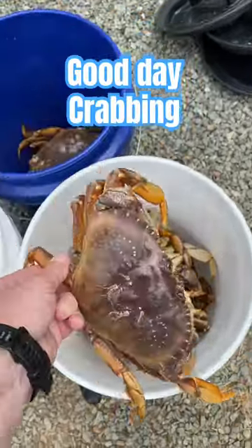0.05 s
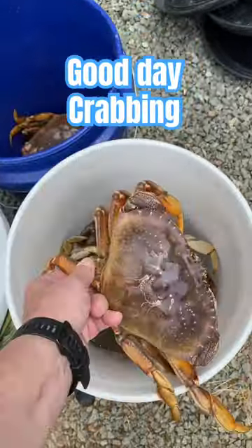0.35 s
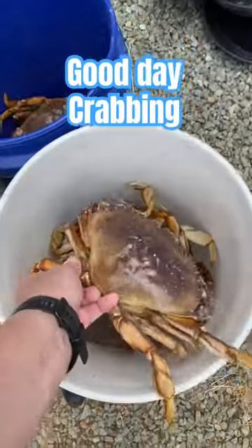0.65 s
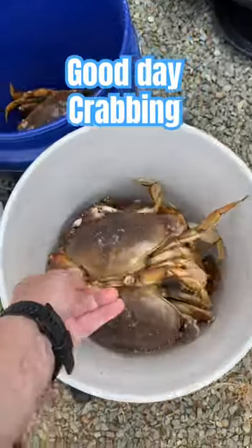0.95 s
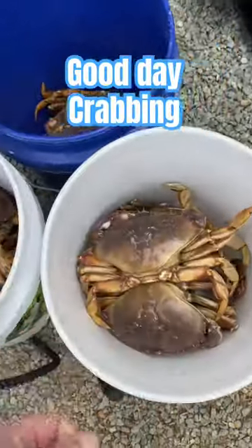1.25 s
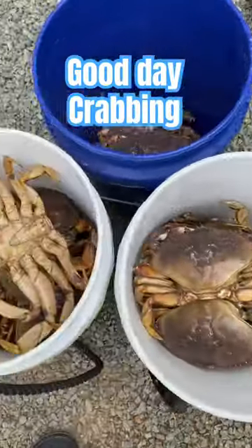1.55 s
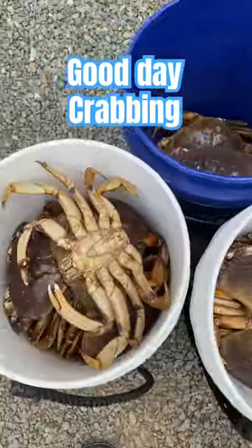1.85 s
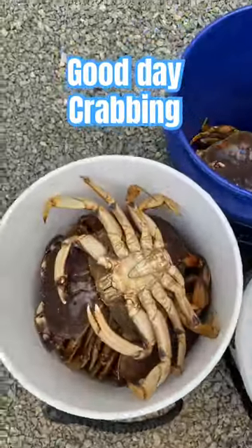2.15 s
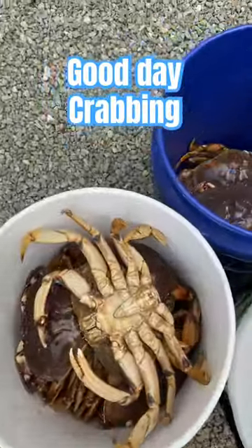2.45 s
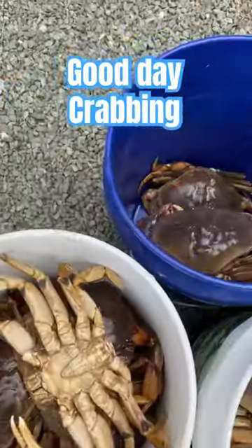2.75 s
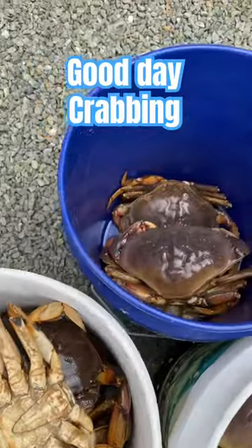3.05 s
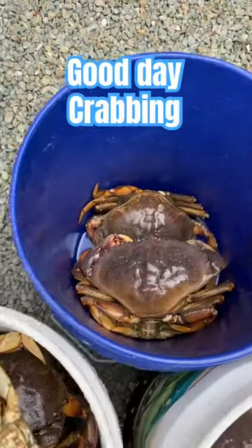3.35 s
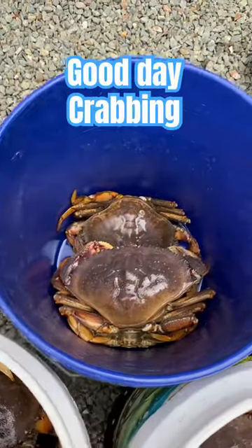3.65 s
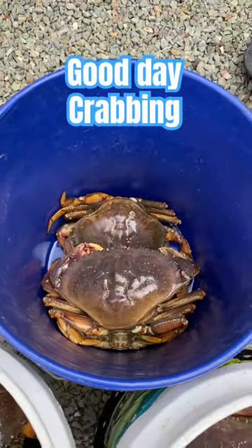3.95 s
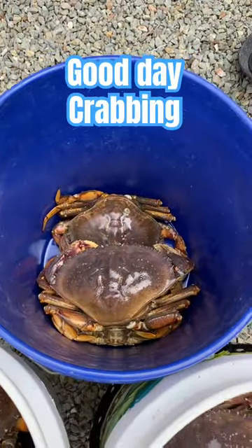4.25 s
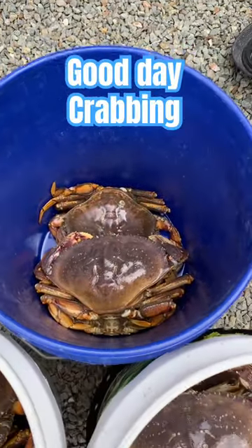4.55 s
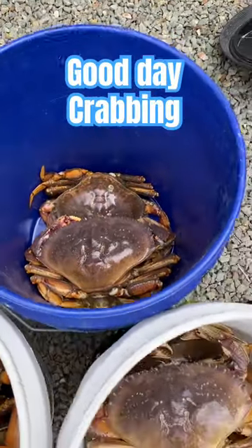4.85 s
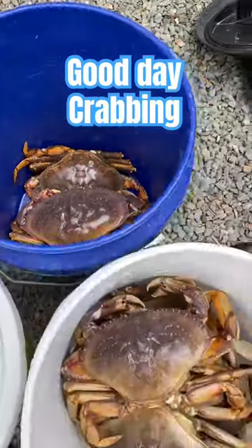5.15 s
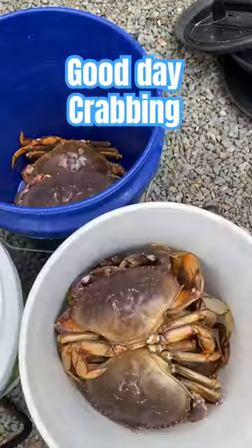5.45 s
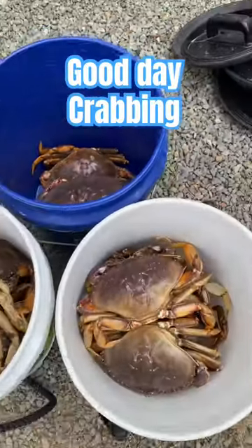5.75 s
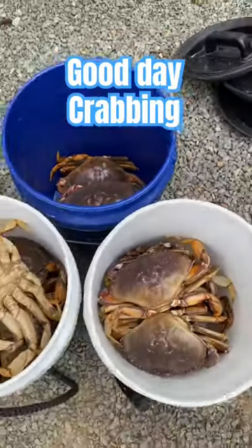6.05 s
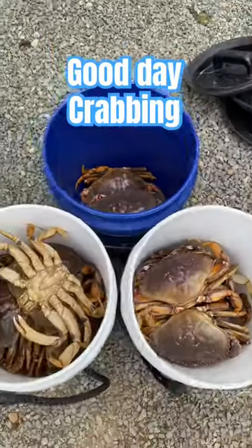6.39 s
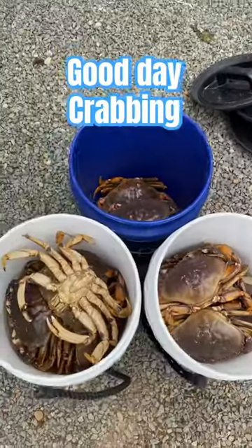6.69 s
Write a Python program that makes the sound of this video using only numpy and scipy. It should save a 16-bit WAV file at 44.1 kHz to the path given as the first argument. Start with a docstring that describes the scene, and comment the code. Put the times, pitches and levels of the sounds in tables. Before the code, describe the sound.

A hand-held microphone moves above buckets of live crabs outdoors. After a few light taps, spiny legs rasp on plastic and one crab drops onto the pile, its shells clattering and the bucket floor booming briefly. The crabs then stir quietly, with sparse clicks, small scrapes and faint wet crackles. A low rumble and hissing drone of far-off machinery continues underneath.

```python
"""Distant machinery rumbles, drones and hisses throughout, heard through the two ports of a hand-held
microphone moving above the buckets. Crabs stir and tap in a plastic bucket on gravel. At 0.6 s a live
crab is lowered in: its spiny legs catch and slip on the wall. From 0.8 s it drops on the others with a
clatter of hollow shells and dull bumps, and its weight booms the bucket floor. Afterwards shells and
claws tap now and then, with brief scrapes and thin ticks of wet leg tips; the drone has short pulses."""
import sys
import numpy as np
from scipy import signal
from scipy.fft import rfft, irfft, next_fast_len
from scipy.io import wavfile
from scipy.ndimage import map_coordinates

SR = 44100
rng = np.random.default_rng(int(sys.argv[2]) if len(sys.argv) > 2 else 0)


def bounce(signal):
    """Save signal as a 16-bit WAV file at the path given by the first command-line argument."""
    frames = np.transpose(np.atleast_2d(signal))
    limited = np.clip(frames, -1, 1)
    pcm = np.round(limited * 32767).astype(np.int16)
    wavfile.write(sys.argv[1], SR, pcm)


N = 300762
TIME = np.arange(N) / SR

# how alike the background is at the two ports: freq_hz, coherence
PORT_COHERENCE = [(130, 0.997), (200, 0.99), (260, 0.45), (370, 0.6), (430, 0.9), (700, 0.88), (850, 0.65),
                  (1150, 0.3), (1650, 0.25), (1950, 0.5), (3000, 0.9), (3800, 0.2), (4600, 0.78),
                  (6200, 0.1), (8500, 0.95)]
# where the background sits in the stereo image: freq_hz, left_right_db
BACKGROUND_PAN = [(100, 0), (200, -0.5), (262, -10.5), (320, -8), (380, -1), (480, 5.5), (620, 6.5),
                  (730, 1.5), (1000, 5.5), (1400, -1), (2100, -5.5), (3000, -0.5), (4000, 1), (5200, 0),
                  (7000, -2.5)]
# left-right phase offset by frequency, nearly opposite around 8.5 and 13.4 kHz: freq_hz, left_lead_rad
STEREO_PHASE = [(0, 0), (210, 0.05), (310, 2.1), (400, 1.3), (500, .6), (620, -.1), (900, .8), (1350, .6),
                (1950, .4), (2400, 1.9), (3000, 2.2), (3600, 1.9), (4400, 0), (7300, .6), (8500, 2.7),
                (10300, .1), (11700, -.2), (13400, -2.8), (15200, -.3)]
# delay of the gravel's reflection at the moving microphone: time_s, lag_ms
GRAVEL_LAG = [(0, 3.8), (0.8, 3), (2.1, 4.22), (3.0, 3.23), (4.2, 3.34), (5.2, 3.46), (5.8, 3.53),
              (6.82, 6.35)]
# tone curves of the machinery's layers: freq_hz, gain_db
RUMBLE_EQ = [(20, -36), (31, -39), (42, -11), (52, -12.5), (68, -3), (88, -4), (98, -4), (128, 2), (182, 1),
             (205, -6), (235, -21), (330, -53), (600, -59)]
LOWER_DRONE_EQ = [(170, -22.5), (255, -2.5), (320, -9), (400, -1.5), (490, 0.5), (640, 0.5), (700, -3),
                  (780, -43), (1000, -46.5)]
UPPER_DRONE_EQ = [(500, -12), (620, -10), (700, 0.5), (745, 1), (810, 3), (848, -53), (1000, -48.5)]
WHIRR_EQ = [(700, -14), (860, 6), (925, 9), (990, 3.5), (1110, 6), (1200, 2), (1450, 7), (1750, -0.5),
            (2000, -2), (2250, -5), (2700, -7), (4000, -33)]
HISS_EQ = [(1200, -42), (2200, -14), (2900, 2.5), (3300, -3), (3800, -4.5), (4600, -3), (6300, -8.5),
           (8300, -15.5), (10300, -8), (13300, -15), (15000, -19), (16000, -33)]
# slow fader rides on the machinery's layers: time_s, level_db
RUMBLE_FADER = [(0, -36), (2, -35), (3.4, -34.5), (4.2, -32.5), (5.2, -34), (5.7, -35.5), (6.82, -37)]
LOWER_DRONE_FADER = [(0, -41), (1.2, -41), (1.6, -37), (2.5, -36), (3.3, -40), (5.3, -42), (5.8, -39),
                     (6.82, -37.5)]
TREBLE_FADER = [(0, -46), (0.5, -48.5), (1.6, -47), (2.7, -45.5), (4, -47), (5.2, -45.5), (5.7, -47),
                (6.82, -46.5)]
# the deepest rumble against the rest of it: time_s, gain_db
SUB_FADER = [(0, -1.5), (0.8, -2), (1.5, 0.5), (3.2, 2), (4.7, -3.5), (6.82, 1.5)]
# narrow bands in the machinery noise: pitch_hz, half_width_hz, level_db
MACHINE_BANDS = [(129.8, 3.1, -53), (655, 25, -49.5), (1404, 17, -56), (1710, 19, -60.5)]
# the drone's lean: time_s, lower_left_right_db, upper_left_right_db
DRONE_PAN = [(0, 0, -0.5), (0.8, 3, -3), (2.1, 2.5, 0), (3.0, -0.5, -4), (4.3, 0, -5.5), (5.3, 1.5, -11),
             (6.3, 0.5, 1), (6.82, -5.5, 33)]
# resonances near the buckets: nearest_s, half_duration_s, pitch_hz, half_width_hz, level_db
PASSING_HOLLOWS = [(0.1, 2.3, 2470, 39, -60), (3.93, 1.03, 2457, 61, -54), (2.6, 1.4, 3100, 300, -66),
                   (4.87, 0.7, 2800, 74, -57.5), (1.7, 0.96, 4500, 380, -63), (6, 0.23, 4650, 320, -60.5),
                   (6.63, 0.21, 4560, 220, -63), (6.5, 0.55, 2330, 280, -55.5)]
# shell taps, with snap, tick and ring relative to the knock: start_s, level_db, knock_hz, snap_hz,
# snap_db, tick_db, contact_ms, left_right_db, echo_send_db, ring_db
SHELL_TAPS = [(0.0309, -18.5, 1350, 2270, 5, -18, 2.9, 2, 2, -20),
              (0.1412, -19, 1924, 2960, -8, -14.5, 1.3, 2, -0.5, -7),
              (0.271, -23, 1500, 2970, -6, -24, 4, 3, 2, -20),
              (0.666, -20, 1550, 4160, -5.5, -17, 2.7, 2, 3, -15),
              (0.7356, -22.5, 1390, 3000, -17, -30, 3.1, 3, 0, -10),
              (0.766, -22, 1510, 4430, -5, -7.5, 2.1, 1, 1, -20),
              (0.785, -19, 1200, 2100, -4, -30, 3, 3, 0, -8),
              (0.7922, -22, 1400, 2100, -12, -30, 3.7, 1, -4, -8),
              (0.8089, -16, 1400, 2800, -12, -18, 1.6, 7, -6, -14),
              (0.812, -9, 1540, 3000, -7, -9.5, 1.5, -1, 0, -12),
              (0.8252, -10, 1400, 4500, -13, -16, 0.72, 2, -3, -16),
              (0.8316, -15, 1380, 3480, -21, -22, 0.97, -3, 3, -14),
              (0.8345, -9.5, 1530, 7150, 4.5, 11.5, 0.89, 4, -2, -20),
              (0.8778, -10, 1540, 4200, -15, -22, 2, -2, -6, -14),
              (0.8827, -10.5, 1770, 4870, -9.5, -5, 1.7, 5, 3.5, -3),
              (0.8882, -14, 1700, 3500, -16, -18, 1.5, 0, -13, -3),
              (0.894, -17, 1640, 3500, -22, -20, 1.1, 2, -5, -8),
              (0.9425, -23, 1500, 3800, -10, -7, 1.1, 2, -8, -14),
              (1.2582, -18.5, 1380, 3540, -2.5, -11.5, 1.8, 0, 2, -20),
              (2.655, -31, 1810, 4200, -13, -18, 2.5, -2, 0, -11),
              (2.672, -32, 1750, 2800, -4, -18, 2, -2, 0, -12),
              (2.735, -24.5, 1910, 2800, 3, -4, 1.9, 2, 2, -14),
              (2.7526, -20.5, 1480, 4200, -6, -7, 2.1, -4, 4, -18),
              (2.883, -28, 1500, 2560, -16, -32, 1.5, -5, 2, -10),
              (3.0379, -19, 1790, 6300, -6, -12, 2, 6, -3, -11),
              (3.04, -17, 1730, 2770, 2, -14, 1.5, -6, -3, -9),
              (3.0448, -16, 1780, 4300, -9, -24, 1.5, -5, -6, -8),
              (3.067, -23, 1800, 3300, -10, -29, 2.4, -6, 1, -5),
              (3.652, -32.5, 1900, 2700, -14, -22, 2, 0, 1, 0),
              (3.67, -32, 1540, 2300, -8, -27, 2.6, -2, 3, -4),
              (4.741, -34, 1930, 2900, -13, -22, 2, -1, -3, -2),
              (4.7738, -23.5, 1830, 4600, -10, -10.5, 3.4, -1, -2, -6),
              (5.414, -33, 1750, 4200, -12, -18, 1.6, 0, -3, 3),
              (5.42, -25, 1640, 4230, -17, -12, 1.4, 3, 1, -1),
              (5.4238, -23, 1410, 3500, -9, -9, 0.98, 0, -10, -13),
              (5.439, -29, 1720, 4120, -10, -17, 1.7, 4, -3, -1),
              (5.45, -25, 1730, 4200, -12, -22, 1.2, 0, -5, 1),
              (5.455, -28, 1750, 4200, -4, -9, 1.2, 1, -6, -1),
              (5.473, -31, 1690, 4100, -5, -16, 1.4, 0, 5, -7),
              (5.68, -35, 1500, 2300, -9, -24, 2, 2, 0, -10),
              (6.131, -31.5, 1490, 2500, -2, -17, 1.5, -5, -3, -12)]
# air and wall modes of the bucket: pitch_hz, level_db, t60_s
BUCKET_MODES = [(565, -8, .16), (900, -3, .16), (1112, -1, .16), (1180, -2, .16), (1374, -2, .14),
                (1470, 1, .16), (1540, 0, .15), (1635, 0, .14), (1776, -3, .12), (1840, -2, .12),
                (1935, -4, .12), (2110, -5, .11), (3325, -3, .11), (4210, -3, .13)]
# shell sliding on plastic and shell: start_s, length_s, level_db, brightness_db, ring_db
SCRAPE_STROKES = [(0.609, 0.05, -40, -18, -9), (0.654, 0.084, -33, -21, -21),
                  (0.776, 0.03, -33.5, -11, -15), (0.805, 0.03, -33.5, 4, -21),
                  (0.849, 0.058, -30, 2.5, -10), (0.905, 0.067, -37.5, 3, -24),
                  (1.34, 0.089, -47.5, -3, -9), (2.641, 0.03, -43, -5, -14), (2.748, 0.008, -40, -1, -21),
                  (2.864, 0.014, -52, -22, -10), (3.034, 0.022, -34, -4.5, -5.5),
                  (3.3, 0.042, -61, 11, -17), (4.764, 0.029, -47, -11, -1), (5.409, 0.014, -45, 5, 5),
                  (5.437, 0.026, -44, 1, 1), (6.28, 0.019, -52, -19, -7)]
# tone curve of the rasp: freq_hz, gain_db
SCRAPE_EQ = [(150, -6), (260, 7.5), (500, -6), (900, 3.5), (1100, -1), (1260, -3.5), (1480, 4), (1780, 5),
             (2100, -3), (2500, -0.5), (3200, -4), (4300, -7), (7000, -20), (11000, -20), (16000, -18)]
# resonances of a rubbed shell: pitch_hz, half_width_hz, level_db
SHELL_RESONANCES = [(1390, 80, 3), (1720, 99, 2.5), (4170, 120, -19), (6860, 170, -12), (10100, 120, -17)]
# the crab's weight settling on the pile: start_s, level_db
LANDING_THUDS = [(0.812, -45), (0.884, -33), (0.901, -26), (0.911, -30.5)]
# modes of the loaded bucket floor: pitch_hz, level_db, t60_s
FLOOR_MODES = [(174, -1, 0.14), (221, 10, 0.18), (258, 2, 0.12), (340, -7, 0.08), (420, -11, 0.084),
               (500, 0, 0.076), (670, -15, 0.08), (896, 8.5, 0.057)]
# thin ticks of wet leg tips: start_s, peak_db, pitch_hz, contact_ms
LEG_TICKS = [(0.8395, -25, 10500, 0.97), (1.41, -30.5, 5840, 2.1), (1.4105, -33, 12000, 1.2),
             (2.71, -42, 7000, 1.5), (2.735, -35, 9900, 1.6), (2.933, -40, 12000, 1.3),
             (3.1445, -42, 9900, 1.2), (3.2093, -39, 11500, 1), (3.35, -42, 12000, 2),
             (3.657, -43, 12000, 1.5), (4.698, -40.5, 9900, 2.2), (5.1165, -41, 9800, 1),
             (5.397, -33, 9500, 1.4), (5.401, -37, 5500, 2.9), (5.485, -42, 6400, 2.8),
             (5.7416, -42, 12200, 1.5), (5.835, -38, 6040, 1.4)]
# dull bumps in the landing, later short pulses in the drone: start_s, peak_db, pitch_hz
LOW_MID_SWELLS = [(0.857, -27, 547), (0.884, -23, 484), (0.918, -32, 680), (2.768, -28, 684),
                  (3.140, -27, 655), (3.727, -29.5, 674), (6.001, -25, 604)]


def gain_of(db):
    """Decibels to amplitude."""
    return 10 ** (np.asarray(db) / 20)


def unit_rms(x):
    """Scales to rms 1."""
    return x / np.sqrt(np.mean(x ** 2) + 1e-20)


def unit_energy(x):
    """Scales each channel to energy 1."""
    return x / np.sqrt(np.sum(x ** 2, -1, keepdims=True) + 1e-20)


def curve_at(points, hz):
    """Reads a table on a log-frequency axis."""
    freq_hz, value = np.transpose(points)
    return np.interp(np.log(hz + 1), np.log(freq_hz + 1), value)


def automation(rows):
    """The columns of a time curve at every sample."""
    time_s, *columns = np.transpose(rows)
    return [np.interp(TIME, time_s, column) for column in columns]


def panned(db):
    """Left and right gains for a left-right difference in dB."""
    return gain_of(np.array([[.5], [-.5]]) * db)


def add(mix, start_s, sound):
    """Mixes a sound in at start_s."""
    part = mix[..., max(round(start_s * SR), 0):][..., :sound.shape[-1]]
    part += sound[..., :part.shape[-1]]


def band(x, lo_hz, hi_hz, order=2):
    """Causal band-pass."""
    sos = signal.butter(order, [lo_hz, min(hi_hz, SR / 2 - 100)], "band", fs=SR, output="sos")
    return signal.sosfilt(sos, x)


def lowpass(x, hz, order):
    """Zero-phase low-pass."""
    return signal.sosfiltfilt(signal.butter(order, hz, fs=SR, output="sos"), x)


def resonance(hz, centre_hz, half_width_hz):
    """Gain of one resonance, with steep skirts."""
    return 1 / (1 + ((hz - centre_hz) / half_width_hz) ** 2)


def ring(modes, t):
    """Dying sines, each starting at a random phase."""
    return sum(gain_of(db - 60 * t / t60_s) * np.sin(2 * np.pi * (hz * t + rng.random()))
               for hz, db, t60_s in modes)


def waver(slow_hz, fast_hz):
    """Random wavering between two rates, rms 1."""
    hz = np.fft.rfftfreq(N, 1 / SR)
    return unit_rms(irfft(rfft(rng.standard_normal(N)) * ((hz > slow_hz) & (hz < fast_hz)), N))


def impulses(shape, per_s, size_db):
    """Randomly timed impulses of uneven size."""
    fires = rng.random(shape) < per_s / SR
    return fires * gain_of(size_db * np.minimum(rng.exponential(1, shape), 3))


def with_tails(triggers, decay_s):
    """Gives each impulse an exponential tail."""
    return signal.lfilter([1], [1, -np.exp(-1 / (decay_s * SR))], triggers)


def contact(t, contact_ms, width=0.45):
    """A short chatter of tiny collisions, a little different at each port."""
    noise = rng.standard_normal((3, len(t)))
    envelope = np.sqrt(t) * np.exp(-t * 1e3 / contact_ms)
    return unit_energy((noise[0] + width * noise[1:]) * envelope)


def air(gain_at):
    """Shaped noise at both ports: alike in the bass, partly unrelated above."""
    size = next_fast_len(N, real=True)
    hz = np.fft.rfftfreq(size, 1 / SR)
    left, unrelated = rfft(rng.standard_normal((2, size)))
    coherence = curve_at(PORT_COHERENCE, hz)
    right = coherence * left + np.sqrt(1 - coherence ** 2) * unrelated
    spectrum = np.array([left, right]) * gain_at(hz) * panned(curve_at(BACKGROUND_PAN, hz))
    return unit_rms(irfft(spectrum, size)[:, :N])


def noise_bed(eq):
    """Stereo noise coloured by a tone curve."""
    return air(lambda hz: gain_of(curve_at(eq, hz)))


def noise_band(centre_hz, half_width_hz):
    """Stereo noise through one resonance."""
    return air(lambda hz: resonance(hz, centre_hz, half_width_hz))


def rumble(throb_db=0.8, sub_hz=103):
    """The machinery's deep, unevenly throbbing rumble, and narrow bands that stand out of its noise."""
    level_db, = automation(RUMBLE_FADER)
    sub_db, = automation(SUB_FADER)
    throb = waver(2, 12)
    noise = noise_bed(RUMBLE_EQ)
    sub = lowpass(noise, sub_hz, order=3)
    body = (noise + (gain_of(sub_db) - 1) * sub) * gain_of(level_db + throb_db * throb)
    return body + sum(noise_band(hz, width_hz) * gain_of(db) for hz, width_hz, db in MACHINE_BANDS)


def drone(sway_db=1.39, upper_db=-43, swell_db_per_ms=6, usual_lag_ms=3.596):
    """A hollow drone in two bands that lean sideways; the upper swells as the microphone comes down."""
    lower_db, = automation(LOWER_DRONE_FADER)
    lower_pan, upper_pan = automation(DRONE_PAN)
    lag_ms, = automation(GRAVEL_LAG)
    swell_db = swell_db_per_ms * (usual_lag_ms - lag_ms)
    sway = waver(1, 8)
    lower = noise_bed(LOWER_DRONE_EQ) * gain_of(lower_db) * panned(lower_pan)
    upper = noise_bed(UPPER_DRONE_EQ) * gain_of(upper_db + swell_db) * panned(upper_pan)
    return (lower + upper) * gain_of(sway_db * sway)


def hiss(top_db=-9.5, top_flutter_db=1.22, whirr_flutter_db=1.0, lean=0.51, centred_at_db=-6.0):
    """A fluttering whirr, topped by hiss that leans with the lower drone."""
    level_db, = automation(TREBLE_FADER)
    pan_db = lean * (automation(DRONE_PAN)[0] - centred_at_db)
    flutter = waver(3, 37)
    whirr = noise_bed(WHIRR_EQ) * gain_of(level_db + whirr_flutter_db * flutter)
    top = noise_bed(HISS_EQ) * gain_of(level_db + top_db + top_flutter_db * flutter)
    return whirr + top * panned(pan_db)


def gravel_reflection(x, gain=0.15):
    """The bounce off the ground combs the sound; the comb slides as the microphone moves."""
    lag_ms, = automation(GRAVEL_LAG)
    delayed_index = np.arange(N) - lag_ms * SR / 1e3
    return x + gain * np.array([map_coordinates(port, [delayed_index], order=3) for port in x])


def hollows():
    """Resonances in the hiss swell and fade as the microphone passes each bucket."""
    return sum(noise_band(hz, width_hz) * gain_of(db) * np.exp(-((TIME - nearest_s) / half_s) ** 2 / 2)
               for nearest_s, half_s, hz, width_hz, db in PASSING_HOLLOWS)


def machinery(dip_s=5.518, dip_width_s=0.022, dip_db=-10, treble_dip_share=0.61):
    """The distant bed of rumble, drone and hiss; its level dips briefly once."""
    duck_db = dip_db * np.exp(-((TIME - dip_s) / dip_width_s) ** 2 / 2)
    lows = rumble() + drone()
    highs = gravel_reflection(hiss()) + hollows()
    return lows * gain_of(duck_db) + highs * gain_of(treble_dip_share * duck_db)


def stirring(level_db=-60):
    """The crabs shift their legs: faint scattered crackles."""
    envelope = with_tails(impulses((2, N), per_s=30, size_db=3.5), decay_s=0.0042)
    crackle = envelope * rng.standard_normal((2, N))
    return gain_of(level_db) * unit_rms(band(crackle, 2000, 2070, order=1))


def wet_crackle(level_db=-72):
    """Films of water part between the moving joints: tiny scattered pops."""
    triggers = impulses(N, per_s=14, size_db=-2.0)
    pop = band(contact(np.arange(512) / SR, contact_ms=1.5), 3000, 12000, order=1)
    return gain_of(level_db) * unit_rms(signal.oaconvolve(triggers[None], pop, axes=1)[:, :N])


def shell_ring(t, knock_hz, snap_hz, attack_s, split=0.06, t60_s=0.036):
    """A struck shell rings with a close pair around its knock pitch, and softer at its snap pitch."""
    modes = [(knock_hz * (1 - split), 0, t60_s), (knock_hz * (1 + split), 0, t60_s), (snap_hz, -6, t60_s)]
    return unit_energy(ring(modes, t) * np.minimum(t / attack_s, 1))


def taps(trim_db=1.0, chatter=0.93, knock_spread=1.225, snap_spread=1.164, body_db=-2.0, give_s=0.001368):
    """A blow within a short chatter: the hollow shell knocks and rings, its edges snap and tick."""
    t, direct, echo_send = np.arange(4096) / SR, np.zeros((2, N)), np.zeros((2, N))
    blow = np.arange(len(t)) == round(give_s * SR)  # the leg gives a little before the shell strikes
    for start_s, db, hz, snap_hz, snap_db, tick_db, contact_ms, pan_db, send_db, ring_db in SHELL_TAPS:
        grit = contact(t, contact_ms)
        force, rasp = blow + chatter * grit, blow / 2 + grit
        knock = unit_energy(band(force, hz / knock_spread, hz * knock_spread))
        body = gain_of(body_db) * unit_energy(band(force, 1000, 1600))
        snap = gain_of(snap_db) * unit_energy(band(rasp, snap_hz / snap_spread, snap_hz * snap_spread))
        tick_top_hz = max(17000 + 265 * db, 10000)  # the band's upper edge is lowered for quieter taps
        tick = gain_of(tick_db) * unit_energy(band(rasp, 7500, tick_top_hz))
        ringing = gain_of(ring_db) * shell_ring(t, hz, snap_hz, give_s)
        hit = knock + body + snap + tick + ringing
        hit = gain_of(db + trim_db) * panned(pan_db) * hit / abs(signal.hilbert(hit)).max()
        add(direct, start_s, hit)
        add(echo_send, start_s, gain_of(send_db) * hit)
    return direct, echo_send


def bucket_echo(x, echo_db=-4.5, echo_t60_s=0.058, modes_db=-20.5):
    """Sound bounces between the close walls, losing treble, and leaves the bucket's modes ringing."""
    t = np.arange(SR // 3) / SR
    echoes = rng.standard_normal((2, len(t))) * (t > .001) * gain_of(-60 * t / echo_t60_s)
    echoes = band(unit_energy(echoes), 180, 8000, order=1)
    modes = unit_energy(np.array([ring(BUCKET_MODES, t), ring(BUCKET_MODES, t)]))
    response = gain_of(echo_db) * echoes + gain_of(modes_db) * modes
    return signal.fftconvolve(x, response, axes=1)[:, :N]


def stroke_envelopes(attack_s=0.0048, release_s=0.019):
    """Each scrape rises, holds and dies away: envelopes for its body, treble and shell ring."""
    power = np.zeros((3, N))
    for start_s, length_s, db, bright_db, ring_db in SCRAPE_STROKES:
        attack = np.clip((TIME - start_s) / attack_s, 0, 1)
        release = np.exp(-np.clip(TIME - start_s - length_s, 0, 1) / release_s)
        power += np.outer(gain_of([0, bright_db, ring_db]), gain_of(db) * attack * release) ** 2
    return np.sqrt(power)


def scrape(slips_per_s=9000, size_db=1.8, catch_db=2.2, centre_share=0.66):
    """Spiny legs catch and slip in dense bunches of tiny jerks that rasp and ring the shell."""
    body_env, treble_env, ring_env = stroke_envelopes()
    catches = unit_rms(band(rng.standard_normal(N), 50, 160))
    sizes = gain_of(size_db * np.minimum(rng.exponential(1, (3, N)), 4) + catch_db * catches)
    slips = (rng.random((3, N)) < slips_per_s / SR) * rng.choice([-1, 1], (3, N)) * sizes
    spectrum = rfft(centre_share * slips[0] + (1 - centre_share) * slips[1:])
    hz = np.fft.rfftfreq(N, 1 / SR)
    rasp = unit_rms(irfft(spectrum * gain_of(curve_at(SCRAPE_EQ, hz)), N))
    shell_gain = sum(gain_of(db) * resonance(hz, pitch, width) for pitch, width, db in SHELL_RESONANCES)
    shell = unit_rms(irfft(spectrum * shell_gain, N))
    body = lowpass(rasp, 2600, order=2)
    return body_env * body + treble_env * (rasp - body) + ring_env * shell


def spines(level_db=-15.0):
    """In a fast stroke the leg spines flick over the shell's edge: a crisp, thin crackle."""
    flicks = with_tails(impulses(N, per_s=420, size_db=3.5), decay_s=0.0004)
    crackle = flicks * (rng.standard_normal(N) + rng.standard_normal((2, N)) / 2)
    _, treble_env, _ = stroke_envelopes()
    return gain_of(level_db) * treble_env * unit_rms(band(crackle, 6500, 12500))


def thuds(rise_s=0.00092, crunch_db=-7.0, crunch_decay_s=0.022):
    """The crab's weight booms the bucket floor while the pile shifts with a dull crunch."""
    t, out = np.arange(SR // 3) / SR, np.zeros(N)
    attack = 1 - np.exp(-t / rise_s)
    for start_s, db in LANDING_THUDS:
        crunch = unit_rms(band(rng.standard_normal(len(t)), 330, 950)) * np.exp(-t / crunch_decay_s)
        boom = .5 * ring(FLOOR_MODES, t)
        add(out, start_s, gain_of(db) * (boom + gain_of(crunch_db) * crunch) * attack)
    return out


def ticks(spread=1.37):
    """Leg tips flick against shell, too lightly to sound its hollow body."""
    t, out = np.arange(1024) / SR, np.zeros((2, N))
    for start_s, db, hz, contact_ms in LEG_TICKS:
        tick = band(contact(t, contact_ms), hz / spread, hz * spread)
        add(out, start_s, gain_of(db) * tick / abs(tick).max())
    return out


def low_mid_swells(swell_s=0.0017):
    """Swells a few cycles long: dull bumps in the landing, later short pulses in the drone."""
    t, out = np.arange(2048) / SR, np.zeros(N)
    envelope = t / swell_s * np.exp(1 - t / swell_s)
    for start_s, db, hz in LOW_MID_SWELLS:
        add(out, start_s, gain_of(db) * envelope * np.sin(2 * np.pi * hz * t))
    return out


def scene():
    """Crabs in their bucket over the machinery bed."""
    tapping, echo_send = taps()
    rubbing = scrape() + stirring()
    crabs = tapping + rubbing + bucket_echo(echo_send + rubbing) + spines() + ticks() + wet_crackle()
    return crabs + thuds() + low_mid_swells() + machinery()


def record(dry, top_hz=16000):
    """A left-right phase offset that varies with frequency, then a steep high cut."""
    lead_rad = curve_at(STEREO_PHASE, np.fft.rfftfreq(N, 1 / SR))
    shifted = irfft(rfft(dry) * np.exp(1j * np.outer([.5, -.5], lead_rad)), N)
    high_cut = signal.firwin(511, top_hz, window=("kaiser", 9), fs=SR)
    return signal.oaconvolve(shifted, high_cut[None], "same")


dry = scene()
out = record(dry)
bounce(out)
```